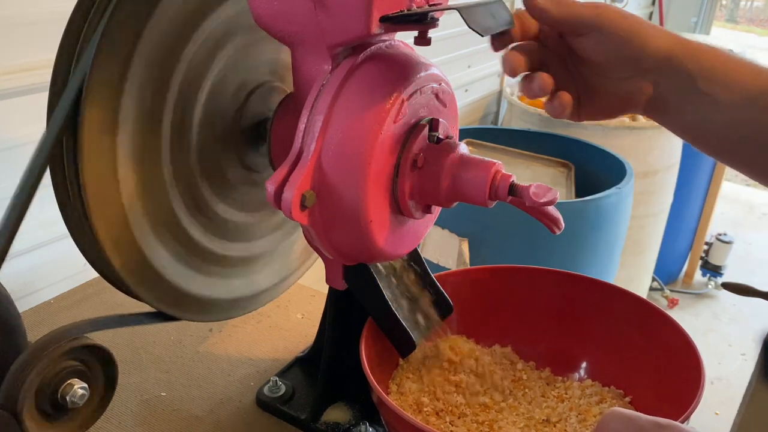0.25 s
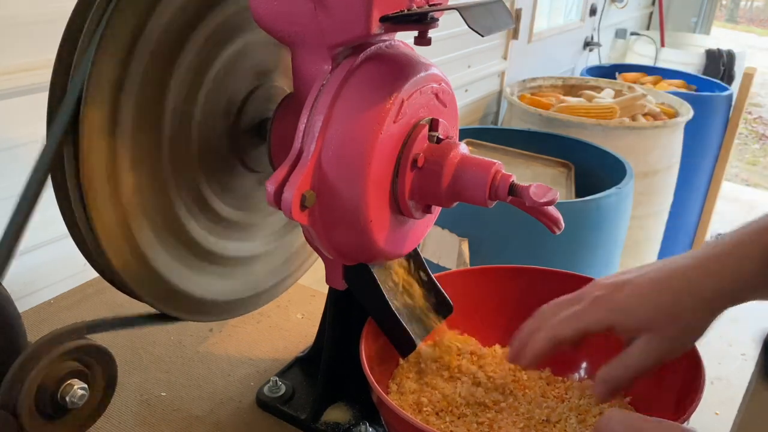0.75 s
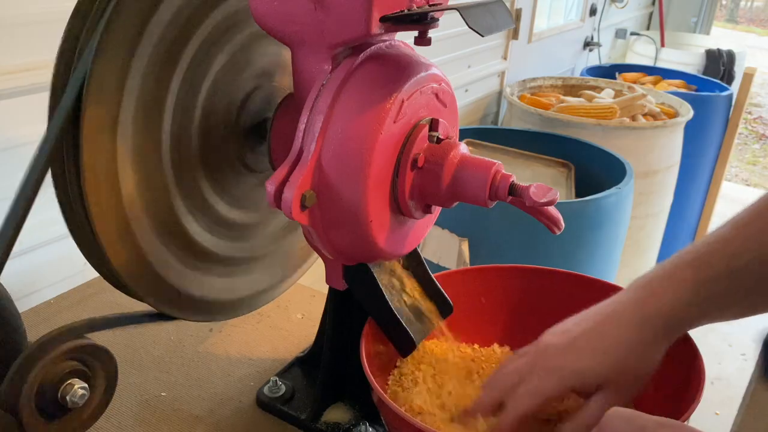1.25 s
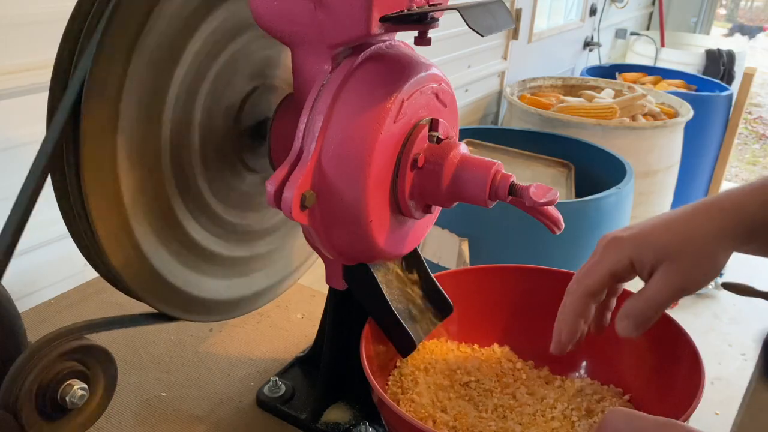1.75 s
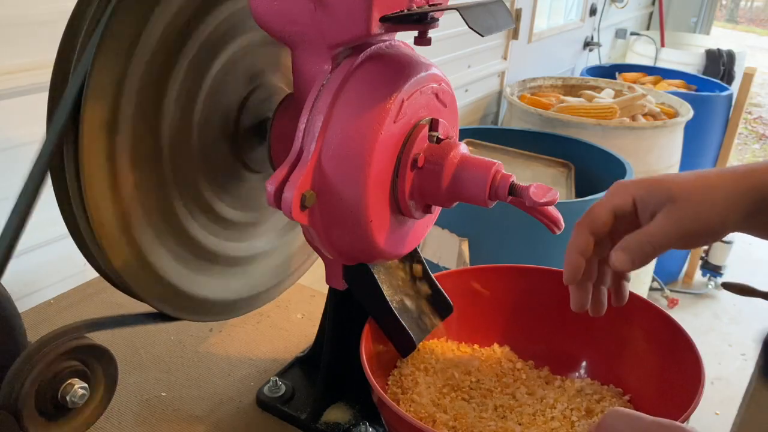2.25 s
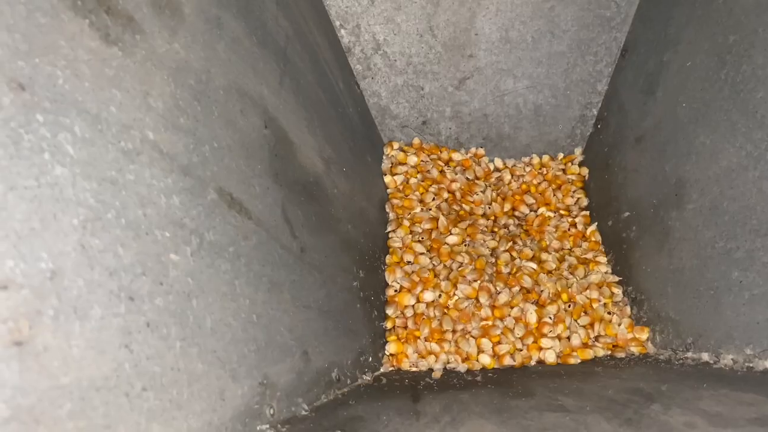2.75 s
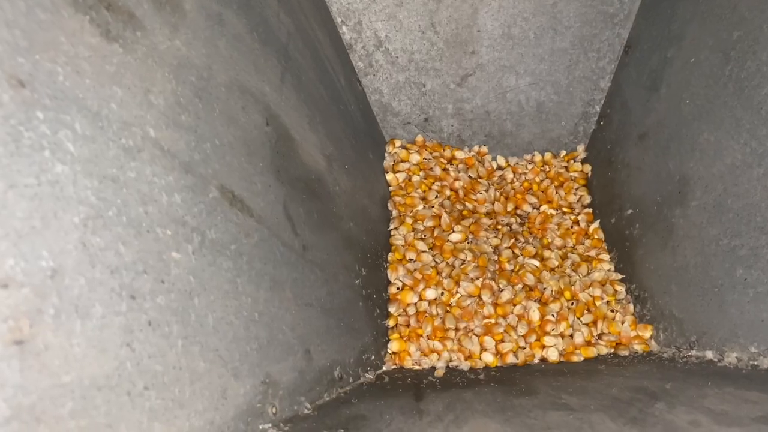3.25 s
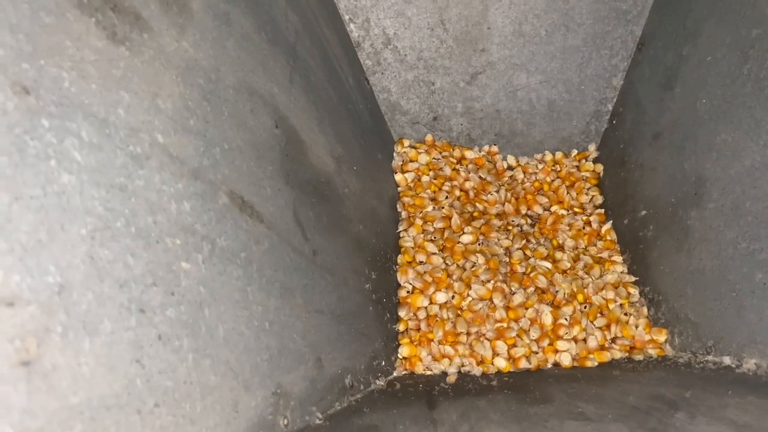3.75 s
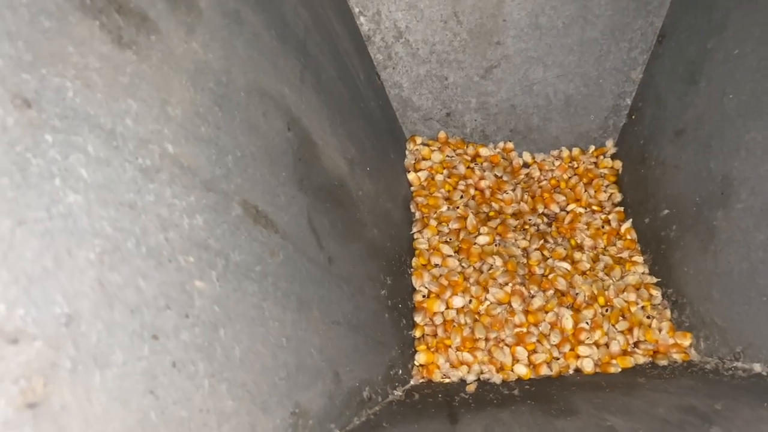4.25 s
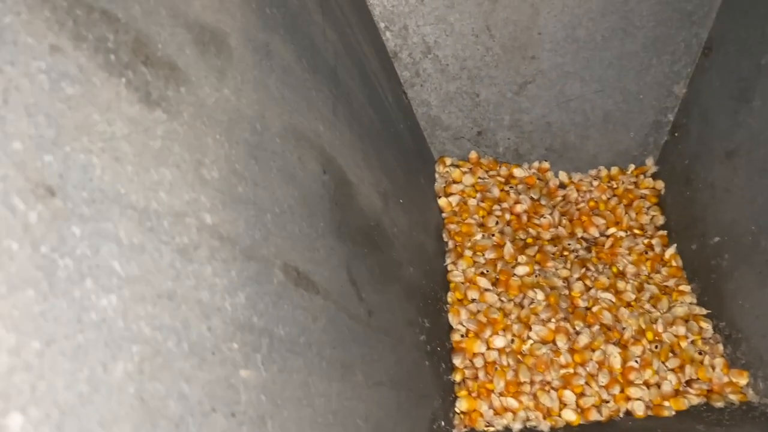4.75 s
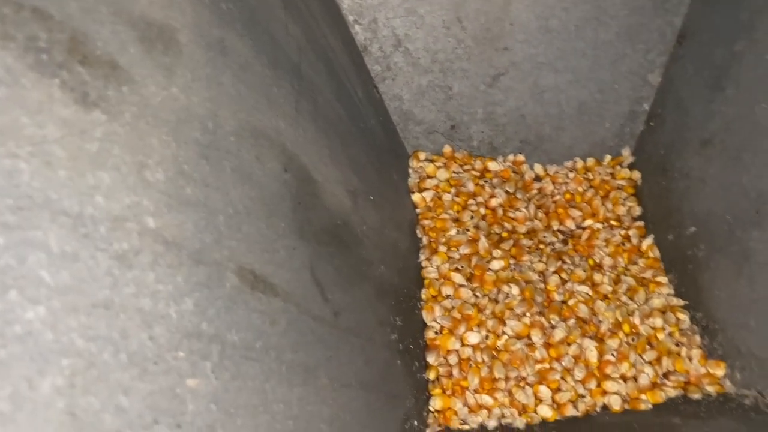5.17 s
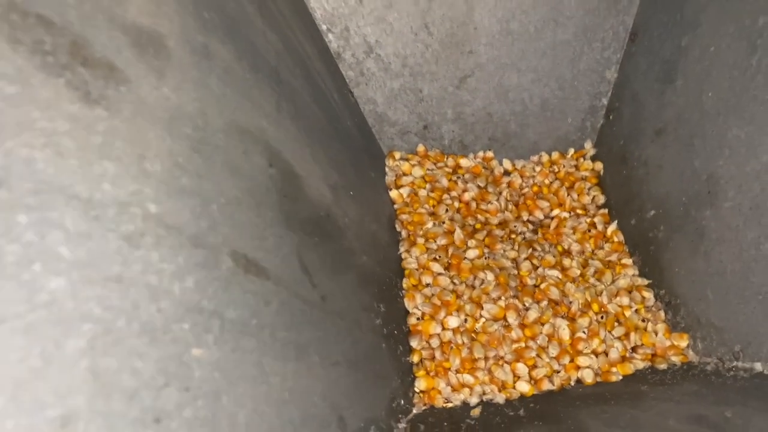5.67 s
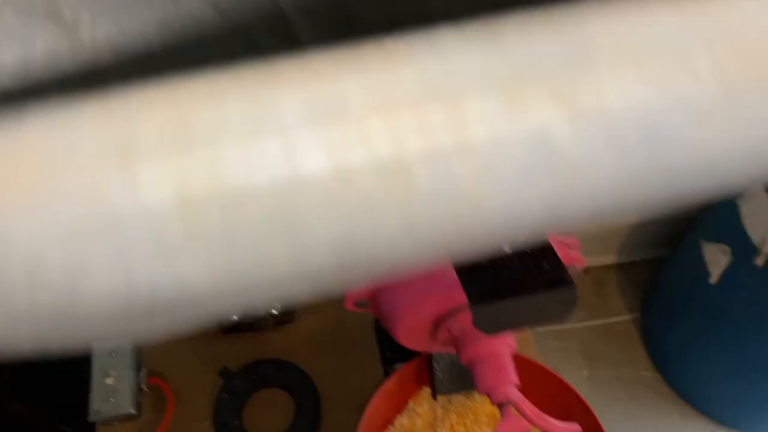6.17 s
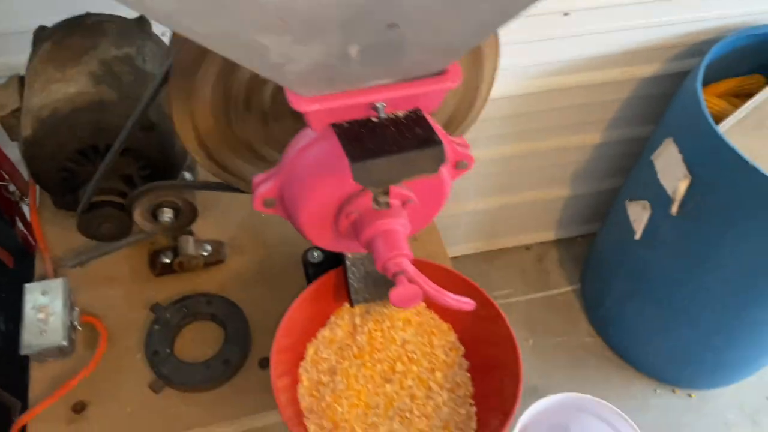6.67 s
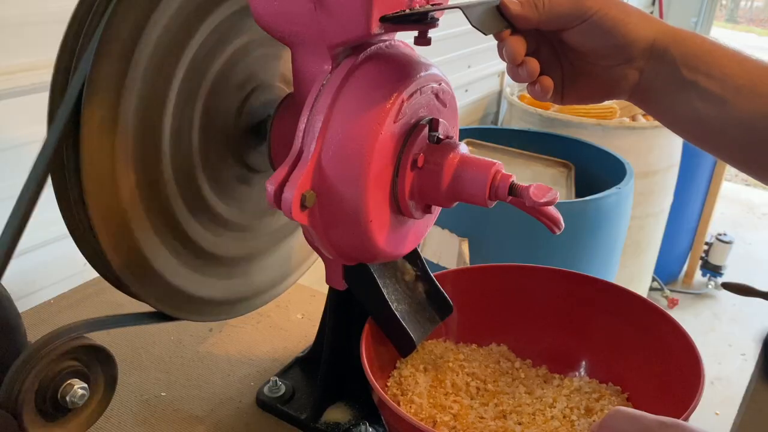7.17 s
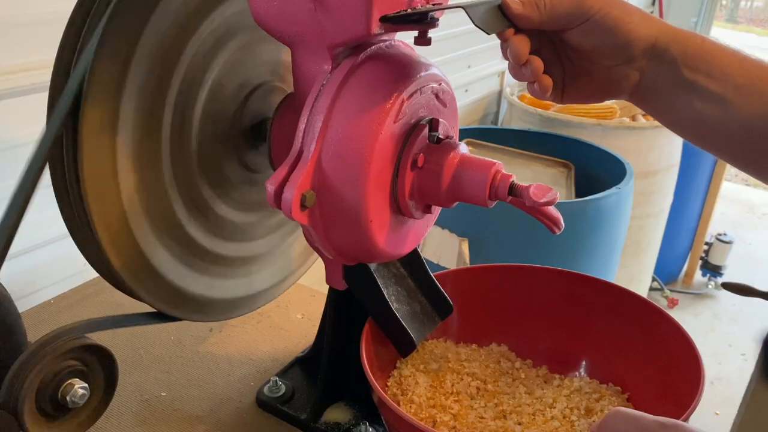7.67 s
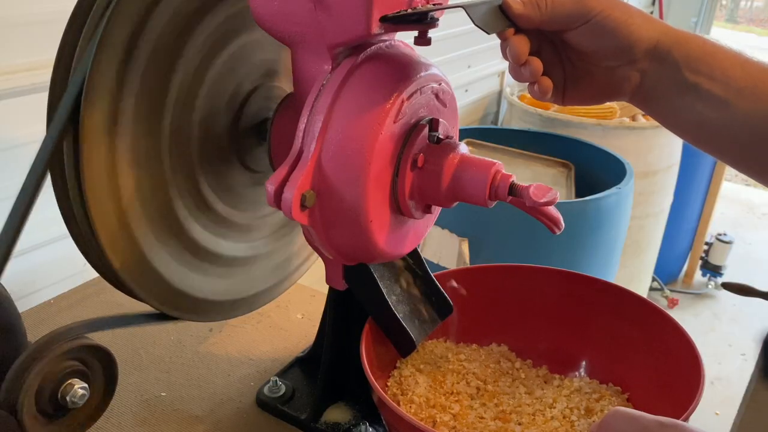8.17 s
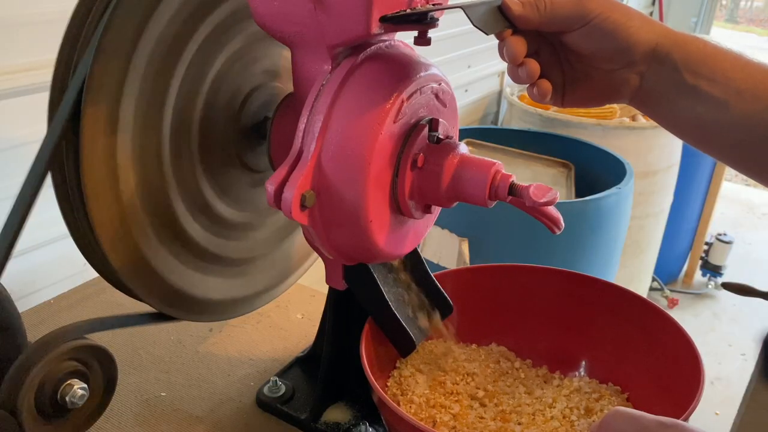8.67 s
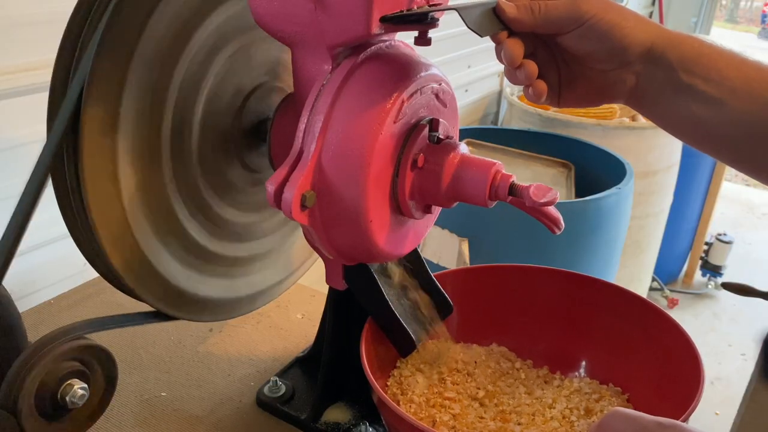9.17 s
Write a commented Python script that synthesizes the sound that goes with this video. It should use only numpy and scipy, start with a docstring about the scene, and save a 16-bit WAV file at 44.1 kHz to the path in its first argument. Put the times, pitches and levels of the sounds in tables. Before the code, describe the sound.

A belt-driven cast-iron mill grinds dried corn close by, rumbling and crunching in rapid uneven bites with sharp kernel cracks and occasional metallic clanks.

```python
"""In a shed, a belt-driven cast-iron burr mill crushes dried corn, heard close by at two ports.
Load surges and bites drive noise through the modes of housing and burr plates.
Hard kernels crack in clustered noise bursts with dying tones; a loose steel part clanks now and then.
Band-shaped noise makes the motor hum, the bench shudder and the whirr of belt and bearings."""
import sys
import numpy as np
from scipy import signal
from scipy.fft import rfft, irfft, next_fast_len
from scipy.io import wavfile
from scipy.ndimage import uniform_filter1d, map_coordinates

SR = 44100
rng = np.random.default_rng(int(sys.argv[2]) if len(sys.argv) > 2 else 0)


def generate_wav(sig):
    """Save sig (samples, or channels by samples) to the path in sys.argv[1] as 16-bit PCM at SR."""
    pcm = np.round(np.clip(np.atleast_2d(sig).T, -1, 1) * 32767).astype(np.int16)
    wavfile.write(sys.argv[1], SR, pcm)


N = 416304

# Levels are relative: the functions add offsets and roughness. Spectra give shape only.
# Slow feed load: t/s, rumble level/dB, grit over rumble/dB
FEED = [(0.0, -18.5, -2.5), (0.8, -28, -12), (1.6, -25, -9), (2.3, -27.5, -8.5), (3.0, -29, -9),
        (3.6, -26, -12.5), (4.21, -33, -11.5), (4.3, -20.5, -18), (5.0, -28.5, -3), (5.6, -16.5, -31),
        (5.85, -24, -5.5), (6.3, -23, -13), (7.2, -21, -11.5), (7.8, -25.5, -7.5), (8.1, -14.5, -9),
        (8.6, -13.5, -4.5), (8.9, -36, -13), (9.44, -17, -11)]
# Mouthfuls caught by the burrs, about one a turn: t/s, half length/s, rumble level/dB, grit over rumble/dB
BITES = [(0.14, 0.033, -18, -14), (0.316, 0.079, -19, -2.5), (0.54, 0.1, -18, -3),
         (0.722, 0.071, -15.5, -7.5), (0.917, 0.086, -19, -7), (1.11, 0.11, -18.5, -13),
         (1.305, 0.1, -23, -12), (1.493, 0.057, -24.5, -17), (1.573, 0.021, -21.5, -12),
         (1.81, 0.073, -16.5, -5), (1.935, 0.036, -19, -8), (2.042, 0.16, -22, -8.5),
         (2.2, 0.092, -20.5, -15), (2.42, 0.035, -20, -22), (2.673, 0.078, -17.5, -13.5),
         (2.866, 0.059, -21.5, -10), (3.114, 0.058, -15.5, -11.5), (3.307, 0.062, -16.5, -35),
         (3.487, 0.024, -20.5, -30), (3.64, 0.03, -24, -23), (3.911, 0.031, -21.5, -28),
         (4.126, 0.026, -20, -13.5), (4.332, 0.12, -20, -6), (4.484, 0.022, -16, -11),
         (4.638, 0.1, -13.5, -5.5), (4.802, 0.013, -12.5, -11.5), (4.951, 0.025, -9.5, -24),
         (5.112, 0.25, -17, -8), (5.278, 0.091, -16.5, -7.5), (5.49, 0.17, -13, -5),
         (5.752, 0.025, -15, -28), (6.017, 0.031, -9.5, -6.5), (6.14, 0.078, -16, -9.5),
         (6.263, 0.23, -17.5, -10), (6.441, 0.038, -13, -9), (6.693, 0.043, -12.5, -9.5),
         (6.895, 0.1, -17.5, -9), (7.005, 0.024, -17.5, -12), (7.089, 0.032, -14, -12),
         (7.349, 0.0086, -9, -18), (7.556, 0.083, -16.5, -11.5), (7.645, 0.06, -15, -26),
         (7.952, 0.052, -11.5, -6.5), (8.168, 0.052, -17, -1), (8.369, 0.04, -19, 4.5),
         (8.527, 0.059, -13, -7), (8.772, 0.052, -12, -7), (9.02, 0.18, -15, -9), (9.229, 0.095, -13, -5.5),
         (9.37, 0.064, -18, -5.5)]
BITE_EXPONENT = 1.4  # 2 is a bell; more flattens the top and steepens the flanks
# Hard kernels cracking: t/s, level/dB, crunch over level/dB, ring f/Hz
CRACKS = [(0.308, -20, -16, 4830), (0.389, -19, -14, 3720), (0.5087, -19.5, -11, 3440),
          (0.5384, -14.5, -14, 4800), (0.646, -18, -7, 4770), (0.704, -14, -17, 2920),
          (0.825, -17, -7, 3190), (0.9113, -22, -6, 4340), (1.1288, -18, 1, 4400), (1.288, -24, 11, 1980),
          (1.322, -23, 10, 3100), (1.483, -25.5, 10, 3470), (1.6068, -9, -4, 3420), (1.82, -14, 7.5, 2730),
          (1.981, -25, 8, 3670), (2.073, -17, -8, 4360), (2.139, -15, -16, 3160), (2.188, -24.5, 15, 3100),
          (2.239, -19.5, 6.5, 4400), (2.374, -18.5, -3, 3850), (2.432, -19.5, 2, 4000),
          (2.5925, -21.5, -12, 4080), (2.6394, -20, 6, 4100), (2.6800, -15, 8, 4200),
          (2.8345, -24, 12.5, 4090), (3.071, -21, -2, 3120), (3.1052, -16.5, 2.5, 4860),
          (3.262, -27, 16.5, 2650), (3.472, -23, -9, 2600), (3.5129, -21, -13, 3870),
          (3.8904, -28, 5, 3760), (4.048, -31.5, 15.5, 2600), (4.1984, -36, -9, 3560),
          (4.2754, -16, 1, 3170), (4.364, -13.5, 2, 4870), (4.4043, -9.5, -23, 4200),
          (4.579, -27, 21.5, 3950), (4.768, -18, 1, 4220), (4.878, -16, -18, 3950), (4.917, -26, 6, 3860),
          (4.9422, -13, -7, 4130), (5.062, -14.5, -5, 3080), (5.1387, -15, 3, 3850),
          (5.235, -17.5, 11.5, 2500), (5.3556, -12.5, -3, 4280), (5.4066, -23, 6.5, 4410),
          (5.565, -10, 9, 2430), (5.807, -36, -16, 3770), (5.9284, -21, -5, 2460), (5.992, -24, -5, 3150),
          (6.119, -6.5, -4, 2770), (6.2615, -15, 6, 3440), (6.442, -14, 2.5, 4220),
          (6.5799, -19, -14, 3710), (6.6457, -19.5, 0, 3130), (6.666, -14, -20, 2440),
          (6.7565, -18.5, -18, 3500), (6.852, -14, 11.5, 3080), (6.987, -16.5, 16.5, 2450),
          (7.3206, -23, -12, 2500), (7.34, -9.5, -4, 3820), (7.468, -11, -24, 3430),
          (7.515, -14.5, -19, 2460), (7.606, -14, 7, 4140), (7.893, -19.5, 7.5, 4100),
          (8.0406, -12, -16, 3430), (8.0646, -20, -13, 4180), (8.108, -11, 1.5, 4200),
          (8.1302, -10, 3, 4110), (8.167, -13, 10, 2500), (8.273, -9.5, 2.5, 3350), (8.5709, -8.5, 1, 3470),
          (8.6188, -15, -15, 4700), (8.744, -13, -16, 4200), (8.9155, -16, -16, 3150),
          (8.982, -12, -15, 3560), (9.0252, -6, -17, 4800), (9.1525, -15.5, 4, 3200),
          (9.242, -11, -18, 3520), (9.4, -17, 5, 4140)]
RING_DB = -16.5  # a crack's ring relative to its level
# Clear single notes knocked out of the iron: t/s, level/dB, f/Hz, t60/s
NOTES = [(1.975, -23, 3640, 0.053), (2.448, -24.5, 1770, 0.086), (2.682, -23, 860, .1),
         (2.684, -17.5, 1304, .09), (2.835, -24, 4170, 0.064), (2.84, -27, 1460, 0.073),
         (3.108, -23, 895, 0.062), (3.318, -19, 1460, 0.073), (3.375, -27, 1400, 0.16),
         (3.475, -21.5, 2180, 0.072), (3.632, -29, 2090, .08), (3.891, -32.5, 3680, .07),
         (4.348, -25, 1440, 0.11), (4.774, -20.5, 1780, 0.15), (4.977, -26, 3700, 0.16),
         (5.806, -21.5, 3710, 0.063), (5.868, -20.5, 1440, 0.092), (6.436, -13, 1484, 0.17),
         (6.581, -24, 3710, 0.043), (6.667, -23, 2470, .07), (6.852, -28, 1790, 0.092),
         (6.855, -9, 885, 0.092), (6.997, -13.5, 617, 0.21), (7.0, -22, 817, 0.15),
         (7.088, -31, 2500, 0.11), (7.437, -28, 1740, 0.21), (8.132, -18, 1840, 0.087),
         (8.14, -13, 1510, .1), (8.501, -15, 1450, .1), (8.796, -21, 1474, 0.17), (8.814, -24, 3670, 0.083)]
# Housing modes: f/Hz, width/Hz, level over the body/dB
HOUSING_MODES = [(142, 24, 6), (227, 14, -4), (255, 43.4, 7.5), (338, 60, 2), (418.2, 3.1, 8.5),
                 (588, 41, 2.5), (880, 69, -3.5)]
# Burr plate modes: f/Hz, width/Hz, level over the body/dB
PLATE_MODES = [(1111, 8.5, -1), (1218.5, 14, 12.5), (1477, 38, 9.5), (1616, 290, -1), (1771, 30, 7),
               (2010, 11, -10), (2230, 14, -4), (2477, 24, 0), (3123, 31, 6.5), (3470, 80, 0),
               (3890, 35, 2), (4144, 46, 5.5), (4744, 340, -10.5), (6340, 12, -9), (3710, 34, -10)]
# Rumble spectrum of the housing: f/Hz, density level/dB
RUMBLE_SPECTRUM = [(20, -70), (50, -51), (100, -13), (190, -5), (260, -4), (400, -5.5), (480, -7.5),
                   (800, -13.5), (1500, -17.5), (3000, -32.5), (8000, -62)]
# Heavy break spectrum: f/Hz, density level/dB
CRUNCH_SPECTRUM = [(80, -25), (200, 0.5), (400, 6), (900, 7), (1600, -1.5), (2600, -4), (4300, -14),
                   (6500, -37)]
# Grit spectrum at the plates: f/Hz, density level/dB
GRIT_SPECTRUM = [(300, -13), (700, 6.5), (1200, -5), (2000, -2.6), (3000, -5.5), (5000, -4.5), (6000, -9.5),
                 (7200, -8), (8800, -9), (10000, -11), (12000, -11.5), (16000, -21)]
# Clanks of a loose steel part: t/s, level/dB, top mode offset/dB
CLANKS = [(0.327, -17, -30), (0.5404, -20.5, -20), (0.7385, -20.5, -26), (1.1456, -22.5, -26),
          (3.1134, -18, -23), (4.638, -18.5, -21), (5.42, -16, -26), (6.272, -23, -30), (8.412, -22, -34),
          (8.4726, -15, -33), (8.576, -17.5, -27), (9.0474, -17, -18)]
# Modes of the steel part: f/Hz, level/dB, nominal t60/s
STEEL_MODES = [(4720, -10, 0.13), (4880, -5.5, 0.11), (6235, -23, 0.2), (10590, 3, 0.34)]
# Hum mode: f/Hz, width/Hz, level over its skirt/dB
HUM_MODES = [(114.4, 8.5, 43)]
# Hum course: t/s, level/dB
HUM_LEVEL = [(0, -33), (.4, -24.5), (.57, -17), (.75, -53), (1.27, -27.5), (1.5, -38), (2.5, -34),
             (2.68, -21.5), (3.1, -42), (4.1, -33), (4.5, -26), (5.2, -37), (5.95, -37), (6.13, -21),
             (6.35, -23.5), (6.5, -30.5), (8.2, -40), (8.44, -19.5), (8.65, -35), (9.44, -35)]
# Bench shudder spectrum: f/Hz, density level/dB
SHUDDER_SPECTRUM = [(25, -38), (40, -27), (60, -1.5), (90, -4), (200, -43)]
# Bench shudder course at mean load: t/s, level/dB
SHUDDER_LEVEL = [(0, -41.5), (2.4, -38.5), (2.8, -41), (6, -35), (7.5, -35), (9, -36.5), (9.44, -46)]
SHUDDER_DB_PER_LOAD_DB, SHUDDER_SMOOTH_S = 0.32, 0.31
# Belt and bearing spectrum: f/Hz, density level/dB
WHIRR_SPECTRUM = [(500, -30), (1000, -11), (1700, 4), (2400, -2), (2900, -15), (3650, -2), (4500, -39),
                  (8000, -27)]
# Left-right correlation before balance and lead: f/Hz, correlation/1
PORT_LIKENESS = [(60, 0.91), (200, 1), (380, 0.9), (550, 0.025), (700, 0.48), (1300, 0.36), (3000, 0.55),
                 (4200, 0.69), (5300, 0.03), (6800, 1), (15000, 1)]
# Port balance: f/Hz, left minus right level/dB
PORT_BALANCE = [(60, 3), (110, 2.5), (200, 2), (380, 1.5), (700, 8), (1290, 2), (2380, 3), (4400, 4),
                (8120, 0)]
# Port phase: f/Hz, lead of the right port/rad
PORT_LEAD = [(600, 0), (2000, -.3), (3000, -1.2), (4100, -.3), (7600, 0), (8900, 3.14), (11000, 6.28),
             (13150, 9.42), (15000, 12.57)]
TOP_HZ = 15900


def mill():
    """The same load and cracks drive noise through housing and plates; struck modes ring on top."""
    rumble_db, grit_db = load()
    t_s, level_db, crunch_db, ring_hz = np.transpose(CRACKS)
    t60_s = 0.082 * amp(rng.normal(0, 1.0, len(t_s)))
    surge = wobble(25)
    shards = crackle(spread_db=3.5, t60_s=0.045, count=1200)

    # power envelopes
    squeeze = amp(rumble_db + 0.78 * surge + 1.38 * wobble(45)) ** 2
    thud_gain = amp(level_db + crunch_db - 8.5)
    thuds = clusters(t_s, thud_gain, 1.52 * t60_s, attack_s=0.001, pieces_db=-9.0)
    scrape = amp(grit_db - 3.0 + 0.68 * surge) ** 2 * (0.39 + 0.28 * shards)
    snaps = clusters(t_s - .001, amp(level_db - 5.5), 1.03 * t60_s, attack_s=0.0011, pieces_db=-12.0)

    housing = through(np.sqrt(squeeze), RUMBLE_SPECTRUM, HOUSING_MODES)
    housing = patchy(housing, patchy_db=1.06, size=512)
    crunch = through(np.sqrt(thuds), CRUNCH_SPECTRUM, HOUSING_MODES + PLATE_MODES, spiky=0.47)
    plates = through(np.sqrt(scrape + snaps), GRIT_SPECTRUM, PLATE_MODES, spiky=0.1)
    plates = patchy(plates, patchy_db=2.1, size=256)
    plates = patchy(plates, patchy_db=1.5, size=96)  # briefer patches

    taps = splinters(grit_db - 3, PLATE_MODES, spread_db=2.0, count=650)
    low_modes = HOUSING_MODES[-2:] + PLATE_MODES[:8]
    taps = taps + splinters(rumble_db - 15.5, low_modes, spread_db=5.0, count=450)
    return housing + crunch + plates + rings(t_s, level_db, ring_hz, t60_s) + taps


def load():
    """Levels of rumble and grit, dB: powers of the slow feed and of a swell per bite add."""
    feed_db, over_db = curves(FEED)
    t = np.arange(N) / SR
    power = amp([feed_db, feed_db + over_db]) ** 2
    for t_s, half_s, level_db, grit_db in BITES:
        near = slice(max(int((t_s - .3) * SR), 0), int((t_s + .3) * SR))
        swell = np.exp(-2 * np.abs((t[near] - t_s) / half_s) ** BITE_EXPONENT)
        power[:, near] += amp([[level_db], [level_db + grit_db]]) ** 2 * swell
    return 10 * np.log10(power)


def clusters(t_s, gain, t60_s, attack_s, pieces_db):
    """A kernel gives way in steps: power of a first break, then three weaker ones close behind."""
    late, weak = rng.random((len(t_s), 6)).T.reshape(2, 3, -1)
    piece_t_s = (t_s + 0.0053 + 0.0295 * late).ravel()
    piece_gain = (gain * amp(pieces_db - 2.7 * weak)).ravel()
    pieces = bursts(piece_t_s, piece_gain, np.tile(0.36 * t60_s, 3), attack_s)
    return bursts(t_s, gain, t60_s, attack_s) + pieces


def crackle(spread_db, t60_s, count):
    """Power envelope, mean 1, of fragments that shatter at random moments."""
    draw = rng.random((count, 3))
    size = amp(-spread_db * np.log(1 - .97 * draw[:, 1]))
    power = bursts(draw[:, 0] * N / SR, size, t60_s * (.5 + draw[:, 2]), attack_s=0.0016)
    return power / np.mean(power)


def splinters(level_db, modes, spread_db, count):
    """Small kernels tap one mode each, a few louder than the rest."""
    out = np.zeros((2, N + SR))
    draw = rng.random((count, 5))
    for when, size, which, life, off in draw:
        f_hz = modes[int(which * len(modes))][0] * (1 + 0.039 * (off - .5))
        tap_db = level_db[int(when * N)] + along(GRIT_SPECTRUM, f_hz) - spread_db * np.log(1 - .95 * size)
        add_mode(out, when * N / SR, f_hz, amp(tap_db), 0.047 + 0.11 * life, rough=0.29)
    return out[:, :N]


def rings(t_s, level_db, ring_hz, t60_s):
    """Each crack excites one dying mode, by where it hits; clear single notes are added."""
    out = np.zeros((2, N + SR))
    for k in range(len(t_s)):
        add_mode(out, t_s[k], ring_hz[k], amp(level_db[k] + RING_DB), 1.7 * t60_s[k], rough=0.95)
    for note_s, note_db, f_hz, note_t60_s in NOTES:
        add_mode(out, note_s, f_hz, amp(note_db), note_t60_s, rough=0.55)
    return out[:, :N]


def clanks():
    """A loose steel part clanks: low modes scrape roughly, then fade thinly; high modes ring on."""
    out = np.zeros((2, N + SR))
    for t_s, level_db, top_db in CLANKS:
        draws = rng.standard_normal((len(STEEL_MODES), 3))
        for (f_hz, mode_db, t60_s), (loud, off, late) in zip(STEEL_MODES, draws):
            gain = amp(level_db + mode_db + top_db * (f_hz > 9000) + 1.5 * loud)
            if f_hz > 6000:
                add_mode(out, t_s + 0.0051 * abs(late), f_hz * (1 + 0.0031 * off), gain, t60_s, rough=1.0)
            else:
                scrape_hz, fade_hz = f_hz * (1 + 0.012 * off), f_hz * (1 - 0.0078 * off)
                fade_s = t_s + 0.006 * abs(late)
                add_mode(out, t_s - .004, scrape_hz, gain * amp(-9), 0.73 * t60_s, rough=3.5)
                add_mode(out, fade_s, fade_hz, gain * amp(-8), 1.6 * t60_s, rough=2.2)
    return out[:, :N]


def motor_hum():
    """Unsteady motor hum: noise through one narrow mode on a broad skirt."""
    hum_db, = curves(HUM_LEVEL)
    skirt = [(60, -38), (116, -18), (220, -30)]  # f/Hz, density level/dB
    return through(amp(hum_db - 4.0), skirt, HUM_MODES)


def bench_shudder():
    """Low noise of the bench, following the load gently and sluggishly."""
    slow_db = uniform_filter1d(load()[0], int(SHUDDER_SMOOTH_S * SR))
    level_db, = curves(SHUDDER_LEVEL)
    level_db = level_db + SHUDDER_DB_PER_LOAD_DB * (slow_db - slow_db.mean())
    return through(amp(level_db), SHUDDER_SPECTRUM, [])


def belt_whirr():
    """Wavering noise of belt and bearings, coloured by the plate modes."""
    return through(amp(-42.5 + 3.8 * wobble(5.3)), WHIRR_SPECTRUM, PLATE_MODES)


def ports(pair):
    """Two fields reach the ports as a shared and an opposed part, with level and phase offsets."""
    def split(f_hz):
        turn = np.arccos(np.clip(along(PORT_LIKENESS, f_hz), -1, 1)) / 2
        return np.array([np.cos(turn), np.sin(turn)])

    def lean(f_hz):
        gain = amp(along(PORT_BALANCE, f_hz) * np.array([[.5], [-.5]]))
        return gain * np.exp(1j * along(PORT_LEAD, f_hz) * np.array([[-.5], [.5]]))

    mid, side = filtered(pair, split)
    return filtered(np.array([mid + side, mid - side]), lean)


def through(force, spectrum, modes, spiky=0.):
    """Force envelope on two noises, coloured by a resonant body; steady force 1 gives rms 1."""
    def body(f_hz):
        peaks = sum(amp(db) * 1j * f_hz * w / (c * c - f_hz * f_hz + 1j * f_hz * w) for c, w, db in modes)
        h = amp(along(spectrum, f_hz)) * (1 + peaks)
        return h / np.sqrt(np.mean(np.abs(h) ** 2))

    # spiky: strong jolts among weak ones, some milliseconds long
    jolts = rng.standard_normal((2, N)) * np.exp(spiky * wobble(400))
    return filtered(force * unit(jolts), body)


def add_mode(out, t_s, f_hz, gain, t60_s, rough):
    """Adds one dying mode whose strength and phase are roughened by rattling contact."""
    t = np.arange(int(SR * np.clip(t60_s, .01, .5))) / SR
    knots = rng.standard_normal((2, 2, 300))
    grid = np.arange(300)
    rattle = [np.interp(t * 500, grid, k[0]) + 1j * np.interp(t * 500, grid, k[1]) for k in knots]
    tone = np.exp(2j * np.pi * (f_hz * t + rng.random((2, 1)))) * (1 + rough * np.array(rattle))
    envelope = gain * amp(-60 * t / t60_s) * (1 - np.exp(-t / 0.0017))
    start = int(t_s * SR)
    out[:, start:start + len(t)] += envelope * tone.real


def bursts(t_s, gain, t60_s, attack_s):
    """Power envelope of bursts that rise fast and die away."""
    power = np.zeros(N + SR)
    t = np.arange(SR // 7) / SR
    for start_s, g, life_s in zip(t_s, gain, t60_s):
        burst = g * amp(-60 * t / max(life_s, .01)) * (1 - np.exp(-t / attack_s))
        power[int(start_s * SR):][:len(t)] += burst ** 2
    return power[:N]


def patchy(x, patchy_db, size):
    """Random patches of gain over pitch and time, the same for both fields."""
    z = signal.stft(x, nperseg=size)[2]
    field = uniform_filter1d(rng.standard_normal(z.shape[1:]), size=5, axis=0)
    field = uniform_filter1d(field, size=8, axis=1)
    gain = amp(patchy_db * unit(field))
    return signal.istft(z * unit(gain), nperseg=size)[1][:, :N]


def filtered(x, response):
    """x times a complex response of frequency."""
    m = next_fast_len(N + SR // 2)
    return irfft(rfft(x, m) * response(np.fft.rfftfreq(m, 1 / SR)), m)[..., :N]


def wobble(knots_per_s):
    """A smooth random curve through knots at the given rate."""
    return map_coordinates(rng.standard_normal(N // 100), [np.arange(N) * knots_per_s / SR])


def curves(rows):
    """One value per sample for each column after the time."""
    t_s, *cols = np.transpose(rows)
    return [np.interp(np.arange(N) / SR, t_s, c) for c in cols]


def along(points, f_hz):
    """(f/Hz, value) points interpolated on a log axis."""
    f, v = np.transpose(points)
    return np.interp(np.log(f_hz + 1), np.log(f + 1), v)


def amp(db):
    """Gain of a level in dB."""
    return 10 ** (np.asarray(db) / 20)


def unit(x):
    """x brought to rms 1."""
    return x / np.sqrt(np.mean(x ** 2) + 1e-20)


def scene():
    """Everything in the shed, as it reaches the two ports."""
    return ports(mill() + clanks() + motor_hum() + bench_shudder() + belt_whirr())


def record(dry):
    """The loudest peaks are squeezed softly; nothing is kept above the band limit."""
    soft = dry / (1 + np.abs(dry / 1.06) ** 4) ** (1 / 4)
    return filtered(soft, lambda f_hz: f_hz < TOP_HZ)


dry = scene()
out = record(dry)
generate_wav(out)
```